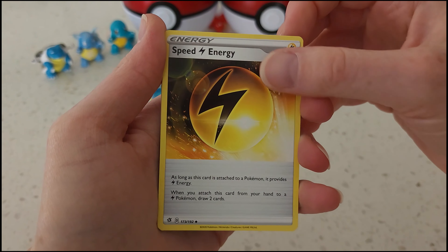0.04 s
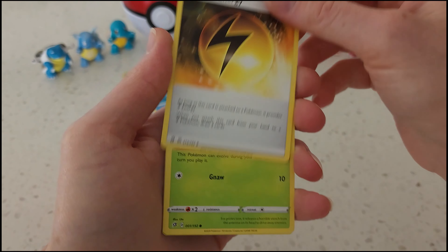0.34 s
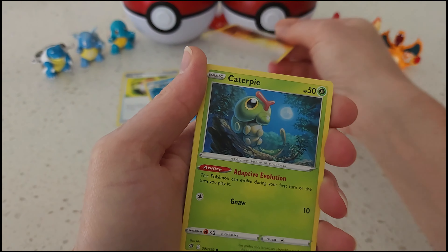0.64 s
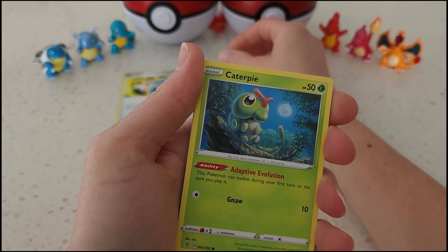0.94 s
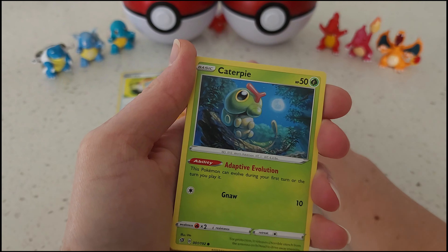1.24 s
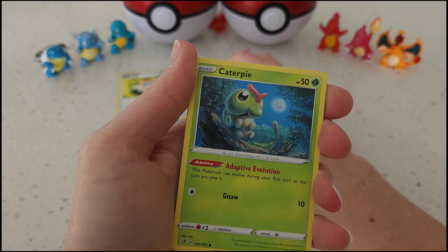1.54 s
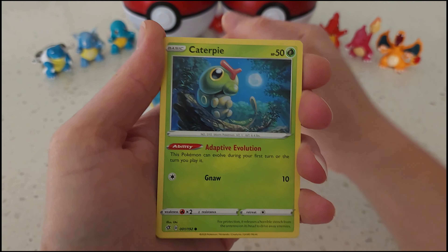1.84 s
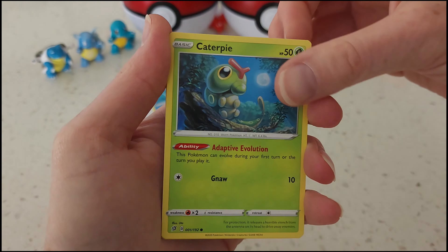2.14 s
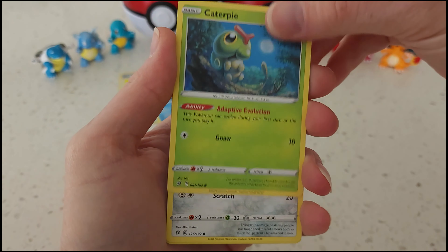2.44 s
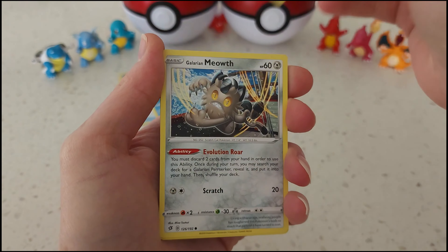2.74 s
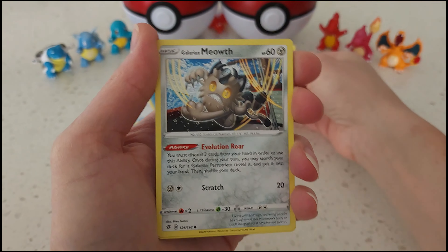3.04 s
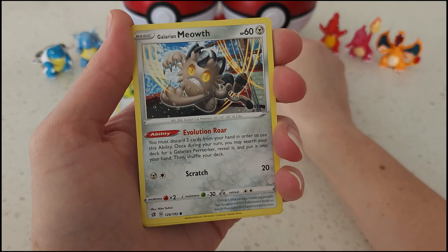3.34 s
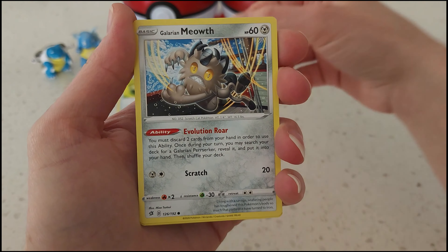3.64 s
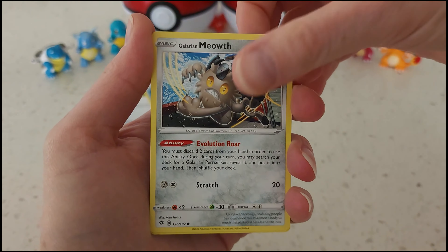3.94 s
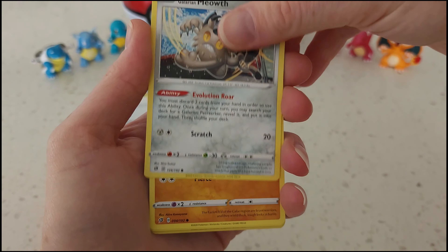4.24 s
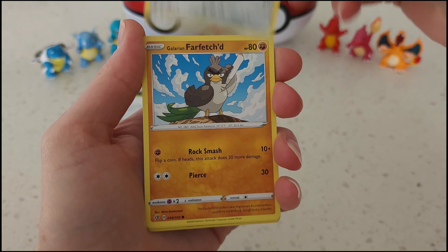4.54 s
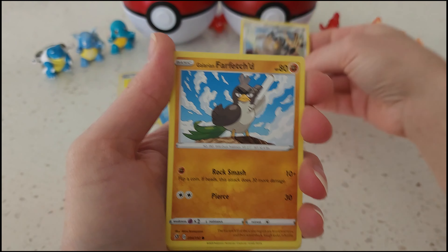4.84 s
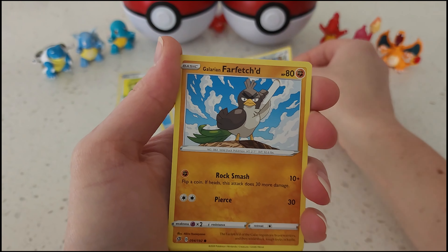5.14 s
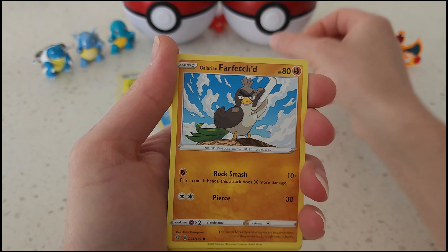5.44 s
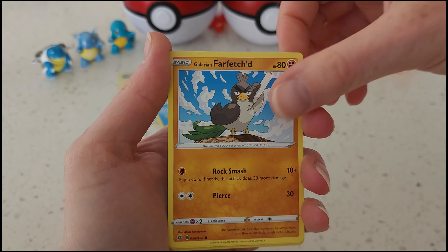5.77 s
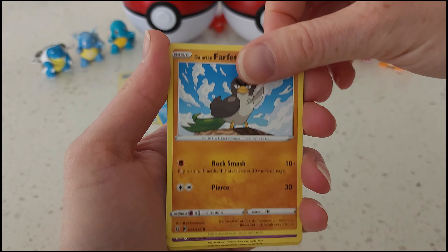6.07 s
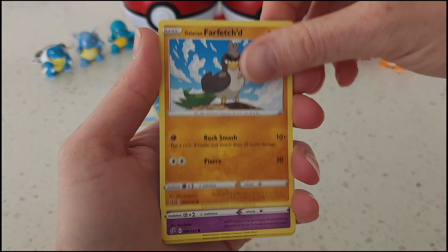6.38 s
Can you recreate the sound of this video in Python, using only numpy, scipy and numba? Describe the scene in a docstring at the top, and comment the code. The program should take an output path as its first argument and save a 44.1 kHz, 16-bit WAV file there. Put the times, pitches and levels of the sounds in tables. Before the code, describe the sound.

Stiff cards slide off a hand-held stack with soft hisses and snaps, landing on a stone table in a quiet room.

```python
"""Trading cards are pulled one at a time off a hand-held stack and laid on a stone table, close to a stereo
microphone. Card faces hiss and rasp as they slide, edges tick, and a card that slips clear of the stack
snaps and thumps against the fingers. On the table it lands with a hollow clack and glides to rest.
The small room answers briefly; far off, a household appliance drones."""
import sys
import numpy as np
from scipy import signal
from scipy.fft import rfft, irfft, next_fast_len
from scipy.io import wavfile
from scipy.ndimage import uniform_filter1d, map_coordinates
from numba import njit

SR = 44100
rng = np.random.default_rng(int(sys.argv[2]) if len(sys.argv) > 2 else 0)


def put_to_file(sound):
    """Save the sound as 16-bit audio at rate SR, in the file named by the first command-line argument."""
    columns = np.atleast_2d(sound).T  # one column per channel
    safe = np.clip(columns, -1, 1)
    whole_steps = np.round(safe * 32767)
    wavfile.write(sys.argv[1], SR, whole_steps.astype(np.int16))


N = 291501
TIME = np.arange(N) / SR

# motor and mains lines of the distant appliance: (frequency [Hz], level [dB])
APPLIANCE_LINES = [(41.09, -51), (58.67, -54.5), (117.38, -65), (234.76, -72.5), (284.6, -73),
                   (352.19, -84), (1056.85, -90), (1173.9, -92), (1701, -95), (2289.08, -95.5),
                   (2993.37, -100.6)]
# room tone and self-noise of the left microphone: (frequency [Hz], density [dB per Hz])
ROOM_TONE = [(20, -92), (45, -76), (70, -83), (125, -81), (200, -91.5), (290, -90), (400, -103),
             (500, -111), (850, -114), (1120, -108), (1420, -116), (2000, -119), (5000, -125.5),
             (15000, -133)]
MIC_SELF_NOISE = [(4000, -140), (6500, -123), (8400, -115), (9800, -136), (11500, -127), (15500, -127)]
# treble lift of the left microphone port, equal loss of the right: (frequency [Hz], gain [dB])
PORT_TILT = [(6000, 0.25), (9000, 0), (11000, 0.1), (15000, 4)]
# reverberation of the small room: (low edge [Hz], high edge [Hz], t60 [s], level [dB])
REVERB_BANDS = [(120, 810, .35, -10), (577, 900, 0.64, -14.5), (926, 2500, 0.34, -14.5),
                (2570, 7400, 0.22, -9), (5900, 23000, .36, -14.5)]

# a card slaps the table: (time [s], knock [dB], treble scrape [dB], length [s])
TABLE_SLAPS = [(.693, -59, -66, .005), (.8848, -43, -50, .003), (.9212, -51.5, -58, .003),
               (3.3485, -58, -60, .004), (3.3535, -51, -53, .0025), (3.3637, -41, -44, .0026),
               (5.1503, -61, -71, .0025), (5.2805, -52, -57, .006), (5.2865, -36.5, -43, .004),
               (5.2948, -42, -41.5, .004), (5.3004, -51, -54, .002)]
# the landed card glides to rest: (time [s], level [dB], t60 [s])
GLIDES = [(3.381, -59.5, 0.48), (5.304, -56, 0.45)]
# resonances of the card as it slaps and as it glides: (frequency [Hz], width [Hz], gain [dB])
SLAP_MODES = [(1031, 98, 8), (1330, 260, 0.5), (2060, 140, 2), (2390, 200, 3), (3120, 120, 0),
              (3460, 100, 4), (4550, 460, 4), (6560, 920, -1)]
GLIDE_MODES = [(1044, 250, -16), (3150, 300, -4), (4060, 300, -8.5), (4660, 1300, -9.5)]
# edges catch on the stack and fingers: (time [s], low [dB], mid [dB], treble [dB], length [s])
EDGE_TICKS = [(.4875, -74, -54, -47, .006), (.557, -61, -60, -56, .003), (1.3265, -86, -77, -61, .003),
              (2.7313, -68, -59, -55, .0036), (2.8285, -38, -27, -41, .0014),
              (2.8375, -35, -52, -55, .0017), (3.281, -67, -54, -61, .004), (3.373, -61, -57, -54, .002),
              (3.378, -66, -46, -44, .0022), (3.8705, -76, -58, -66, .0018), (4.098, -79, -70, -63, .0022),
              (4.138, -80, -76, -57.5, .0018), (4.5662, -54, -50, -55, .0032),
              (4.662, -48, -42.5, -51, .0022), (4.7002, -58, -48.5, -45.5, .0023),
              (6.445, -80, -77, -65, .002)]
# colours of an edge's low, mid and treble bands: (frequency [Hz], gain [dB])
EDGE_LOW = [(100, -21), (300, -3.5), (600, -13.5), (950, -3), (1300, -28.5), (3000, -33)]
EDGE_MID = [(500, -38.5), (1000, 2.5), (1400, -2.5), (1750, 2), (2300, -2.5), (2900, -3.5), (3500, -7),
            (4600, -7.5), (6500, -12), (12000, -49)]
EDGE_TREBLE = [(2000, -31), (4800, 0), (8000, 6), (10500, 0), (15500, -1.5)]
# the bent card springs free, or card and fingers bump the stack:
# (time [s], level [dB], contact cut-off [Hz], thump gain [dB])
SNAPS = [(0.559, -44.5, 1090, -7), (2.829, -18.5, 5600, -1), (2.8362, -47, 900, -17),
         (2.8443, -17.5, 900, -10), (2.853, -44, 900, 4), (3.089, -49.5, 500, 11), (3.366, -45.5, 500, 3),
         (3.8707, -50, 1900, -20), (4.568, -41.5, 600, 7.5), (4.6627, -32, 1700, 0),
         (4.678, -43.5, 890, 2.5), (5.2964, -34, 1100, -3), (5.589, -41.5, 168, 5.5), (5.66, -41.5, 140, 7),
         (5.74, -40, 149, 6.5)]
# modes of card and stack held in the hand: (frequency [Hz], gain [dB], t60 [s])
HELD_MODES = [(148.7, -8, 0.07), (261, -13, 0.061), (341.6, -12, 0.075), (460, -14.5, 0.025),
              (644, -12.5, 0.032), (787, -15.5, .035), (859, -15.5, 0.045), (1080, -10.5, 0.0047),
              (1430, -13.5, 0.033), (1630, -4, 0.014), (1860, -3.5, .012), (2600, -15, 0.021),
              (3230, -18, .008), (4020, -11, .007), (5220, -11.5, .006), (6660, -13, 0.0086)]

# friction colours of the face, the body and a light touch's thin hiss: (frequency [Hz], gain [dB])
FACE_HISS = [(1500, -28), (3000, -7), (4400, -.5), (6000, -1), (8700, -1), (10500, -1.5), (12500, -.5),
             (15000, 0)]
BODY_RASP = [(200, -17.5), (450, -9.5), (700, -9), (1100, -8.5), (1600, -0.5), (2000, -3.5), (2500, -2.5),
             (3500, -8.5), (4800, -9), (7000, -10), (14000, -35)]
LIGHT_TOUCH = [(3000, -12), (5500, -10), (7200, 1), (9000, 5), (10500, -3), (15000, -5)]
# the top card is drawn over the stack, often ending in a tug:
# (start [s], length [s], final hiss [dB], final rasp [dB], tug length [s], tug [dB])
PULLS = [(0.353, 0.17, -34.5, -51, 0.045, 16.5), (2.486, .088, -61, -60, 0.038, -3),
         (2.73, 0.1, -41.5, -44.5, 0.1, 19.5), (4.281, 0.13, -56.5, -54, 0.055, 0.5),
         (4.556, .101, -39.5, -45, 0.049, 11), (6.451, 0.11, -49.5, -51.5, 0.1, 9.5)]
# fingers shift a card in a soft swell: (middle [s], half length [s], hiss [dB], rasp [dB])
FINGER_RUBS = [(0.176, 0.019, -62.5, -87), (0.228, 0.034, -75, -69.5), (.27, 0.015, -60, -69.5),
               (0.546, 0.016, -65, -56.5), (0.696, 0.016, -63, -69), (0.79, 0.074, -67.5, -97),
               (1.03, .05, -70, -85), (1.223, 0.1, -76, -100), (1.344, 0.014, -64, -86),
               (1.428, 0.1, -70.5, -84), (1.946, 0.22, -77.5, -88), (2.336, 0.022, -65, -78),
               (2.436, 0.043, -61.5, -74.5), (2.895, 0.059, -67, -66), (2.97, 0.1, -59, -66.5),
               (3.122, 0.02, -60.5, -69.5), (3.353, .009, -60, -50), (4.253, 0.047, -57, -70),
               (4.481, 0.016, -89.5, -71), (4.687, 0.037, -64, -59.5), (4.803, 0.1, -62.5, -73),
               (4.95, 0.038, -64, -76.5), (5.048, 0.019, -66.5, -65), (6.094, 0.11, -65, -85),
               (6.206, 0.046, -69, -75), (6.32, 0.027, -61.5, -79), (6.602, 0.026, -45.5, -58)]
# the card skims onto the pile, pressing harder until flat: (time it lies flat [s], hiss [dB], rasp [dB])
PILE_SKIMS = [(0.929, -70, -69), (3.375, -53.5, -58), (5.315, -58.5, -65)]


def undb(db):
    """Decibels to gain."""
    return 10 ** (np.asarray(db) / 20)


def unit(x):
    """Scale to rms 1."""
    return x / np.sqrt(np.mean(x ** 2))


def colour(x, points):
    """Filter by (frequency [Hz], gain [dB]) points joined on a log-frequency axis."""
    hz, db = np.transpose(points)
    size = next_fast_len(N + SR // 10)
    bin_hz = np.maximum(np.fft.rfftfreq(size, 1 / SR), 1)
    gain = undb(np.interp(np.log(bin_hz), np.log(hz), db))
    return irfft(rfft(x, size) * gain, size)[..., :N]


def noise_pair(correlation):
    """Partly alike white noise for left and right."""
    mid, side = rng.standard_normal((2, N))
    return (np.sqrt(1 + correlation) * mid + np.sqrt(1 - correlation) * np.array([side, -side])) / np.sqrt(2)


def wander(rate_hz):
    """Smooth random wandering with rms 1."""
    hold = int(SR / rate_hz)
    stairs = np.repeat(rng.standard_normal(N // hold + 1), hold)
    return unit(uniform_filter1d(stairs, hold)[:N])


def pan(db):
    """Left and right gains for a left-minus-right level."""
    return undb(np.array([[db], [-db]]) / 2)


def step(at_s, width_s):
    """Smooth change from 0 to 1 around a moment."""
    return .5 + .5 * np.tanh((TIME - at_s) / width_s)


@njit
def resonance(x, hz, q):
    """State-variable band-pass whose centre can move."""
    out, band_state, low_state = np.empty(len(x)), 0., 0.
    for i in range(len(x)):
        g = np.tan(np.pi * hz[i] / SR)
        band = (band_state + g * (x[i] - low_state)) / (1 + g * (g + 1 / q))
        band_state = 2 * band - band_state
        low_state += 2 * g * band
        out[i] = band / q
    return out


def appliance(waver_s=.0005):
    """Far off, motor and mains lines drone; their timing wavers, which blurs the higher ones."""
    hum = 0
    for hz, db in APPLIANCE_LINES:
        amplitude = np.sqrt(2) * undb(db + 2 * wander(2.5))
        phase = 2 * np.pi * (hz * TIME + rng.random()) + hz * waver_s * wander(8.7)
        hum += amplitude * np.sin(phase)
    return hum


def room_tone(split_hz=600):
    """A soft rumble: long waves reach both microphone ports alike, short ones do not."""
    shared = signal.sosfilt(signal.butter(2, split_hz, fs=SR, output="sos"), noise_pair(.88))
    apart = signal.sosfilt(signal.butter(2, split_hz, "high", fs=SR, output="sos"), noise_pair(0))
    return np.sqrt(SR / 2) * colour(shared + apart, ROOM_TONE) * undb(.59 * wander(8.3))


def microphone_hiss():
    """Faint self-noise, on the left only."""
    return np.sqrt(SR / 2) * colour(rng.standard_normal(N), MIC_SELF_NOISE) * np.array([[1], [0]])


def reflections(x):
    """The small room's diffuse answer differs at each port and dies at its own rate in each band."""
    age = np.arange(int(.6 * SR)) / SR
    response = 0
    for low_hz, high_hz, t60, db in REVERB_BANDS:
        band = signal.butter(2, [low_hz, min(high_hz, .45 * SR)], "band", fs=SR, output="sos")
        tail = np.exp(-np.log(1000) * age / t60) * (1 - np.exp(-(age / .006) ** 2))
        tail /= np.sqrt(np.sum(tail ** 2))
        response += undb(db) * signal.sosfilt(band, tail * rng.standard_normal((2, len(age))))
    return signal.fftconvolve(x, response, axes=1)[:, :N]


def friction(grain_db, flutter_db):
    """Friction force: tiny slips of the card's coating on top of an uneven finger pressure."""
    return unit(undb(grain_db * wander(1800) + flutter_db * wander(90)))


def rubbed_modes(force, modes, correlation):
    """Slips ring a set of resonances, each driven by its own noise."""
    ringing = 0
    for hz, width, db in modes:
        slips = force * noise_pair(correlation)
        centre_hz = np.full(N, float(hz))
        ringing += undb(db) * np.array([resonance(side, centre_hz, hz / width) for side in slips])
    return unit(ringing)


def bursts(times, levels_db, lengths):
    """Envelope of short, sharp contacts, each with its level set over the first 4 ms."""
    envelope = np.zeros(N)
    age = np.arange(SR // 20) / SR
    for at_s, db, length in zip(times, levels_db, lengths):
        start = int(at_s * SR)
        shape = (1 - np.exp(-age / .00081)) * np.exp(-(age / (.61 * length)) ** .99)
        envelope[start:start + len(age)] += undb(db) * shape / np.sqrt(np.mean(shape[:SR // 250] ** 2))
    return envelope


def table_landings():
    """The card slaps the stone with a hollow clack and a scrape, then glides to rest."""
    times, knock_db, scrape_db, lengths = np.transpose(TABLE_SLAPS)
    force = friction(grain_db=5, flutter_db=-4.8)
    # the edge strikes first and rings the card; the face then patters down
    age = np.arange(SR // 50) / SR
    ring = sum(undb(db) * np.sin(2 * np.pi * hz * age) * np.exp(-np.pi * width * age)
               for hz, width, db in SLAP_MODES)
    blows = np.zeros(N)
    blows[(times * SR).astype(int)] = undb(knock_db)
    clack = signal.fftconvolve(blows, ring / np.std(ring[:SR // 250]))[:N]
    patter = bursts(times + lengths / 4, knock_db, lengths) * rubbed_modes(force, SLAP_MODES, .17)
    no_bass = signal.butter(3, 750, "high", fs=SR, output="sos")  # a small card radiates no long waves
    knock = signal.sosfilt(no_bass, .65 * clack + .75 * patter)
    scrape = bursts(times, scrape_db, lengths) * unit(colour(force * noise_pair(.048), EDGE_TREBLE))
    speed = sum((TIME > start) * undb(db - 60 * np.abs(TIME - start) / t60) for start, db, t60 in GLIDES)
    glide = speed * rubbed_modes(force, GLIDE_MODES, .074)
    return (knock + scrape + glide) * pan(-.54)


def edge_ticks():
    """An edge scrapes for a few milliseconds: a sharp burst of slips."""
    times, low_db, mid_db, treble_db, lengths = np.transpose(EDGE_TICKS)
    force = friction(grain_db=1, flutter_db=2)
    bands = [(low_db, EDGE_LOW, .8), (mid_db, EDGE_MID, .45), (treble_db, EDGE_TREBLE, .15)]
    return sum(bursts(times, db, lengths) * unit(colour(force * noise_pair(correlation), points))
               for db, points, correlation in bands)


def card_snaps(thump_below_hz=500):
    """Each blow rings the held card's modes; soft contacts are dull, and the hand adds a low thump."""
    snaps = np.zeros(N)
    age = np.arange(SR // 5) / SR
    hz, db, t60 = np.transpose(HELD_MODES)[:, :, None]
    polarity = (-1) ** np.arange(len(hz))[:, None]  # neighbouring modes bend opposite ways
    rings = polarity * undb(db) * np.sin(2 * np.pi * hz * age) * np.exp(-np.log(1000) * age / t60)
    for at_s, blow_db, contact_hz, thump_db in SNAPS:
        weight = undb(blow_db + thump_db * (hz < thump_below_hz)) / np.sqrt(1 + (hz / contact_hz) ** 4)
        start = int(at_s * SR)
        snaps[start:start + len(age)] += (weight * rings).sum(axis=0)
    return np.array([snaps, np.roll(snaps, shift=2)])  # the left port hears it slightly earlier


def flex(x, depth_db, patch_hz, patch_s):
    """The bending card favours ever different pitches: narrow peaks and dips come and go."""
    hz, times, frames = signal.stft(x, SR, nperseg=512)
    field = rng.standard_normal((256, 1024))
    where = np.meshgrid(hz / patch_hz, times / patch_s, indexing="ij")
    gain = undb(depth_db * map_coordinates(field, where, order=3, mode="wrap"))
    return unit(signal.istft(frames * gain, SR)[1][:, :N])


def hand_strokes():
    """Pulls, rubs and skims add in power to drive hiss and rasp; pulls also move the card's resonance."""
    loose_hz, pinned_hz, free_hz = 2270., 3600, 1750  # in the fingers, on the stack, fully drawn
    hiss_swell_db, rasp_swell_db = 8, 22.5  # a pull gathers speed
    tug_ease, tug_rasp_share = 2.36, .34  # the tug bites at once and levels off
    skim_rise_db_per_s, skim_fall_db_per_s = 113, 270
    moves, ring_hz = [], np.full(N, loose_hz)
    for start, length, hiss_db, rasp_db, tug_s, tug_db in PULLS:
        drawn = np.clip((TIME - start) / length, 0, 1)
        touching = step(start, width_s=.004) * (1 - step(start + length, width_s=.007))
        held_back_db = tug_db * np.clip((start + length - TIME) / tug_s, 0, 1) ** tug_ease
        hiss_curve_db = hiss_db - hiss_swell_db * (1 - drawn) - held_back_db
        rasp_curve_db = rasp_db - rasp_swell_db * (1 - drawn) - tug_rasp_share * held_back_db
        moves.append(touching * undb([hiss_curve_db, rasp_curve_db]))
        ring_hz += touching * (pinned_hz * (free_hz / pinned_hz) ** drawn - loose_hz)
    for middle, half_length, hiss_db, rasp_db in FINGER_RUBS:
        offset = np.minimum(np.abs((TIME - middle) / half_length), 10)
        swell = np.exp(-offset ** 1.7)  # a power of 2 is round, 1 pointed
        moves.append(swell * undb([[hiss_db], [rasp_db]]))
    for flat_s, hiss_db, rasp_db in PILE_SKIMS:
        age = TIME - flat_s
        pressure = undb(-np.maximum(-skim_rise_db_per_s * age, skim_fall_db_per_s * age))
        moves.append(pressure * undb([[hiss_db], [rasp_db]]))
    hiss_gain, rasp_gain = np.sqrt(sum(move ** 2 for move in moves))
    return hiss_gain, rasp_gain, ring_hz


def card_slides(full_rasp_db=-60.5):
    """Slips radiate directly as hiss and shake the card, whose resonance moves with its free length."""
    hiss_gain, rasp_gain, ring_hz = hand_strokes()
    force = friction(grain_db=0, flutter_db=1.5)
    hiss = flex(colour(force * noise_pair(-.05), FACE_HISS), depth_db=2.8, patch_hz=330, patch_s=.04)
    fullness = np.minimum(rasp_gain / undb(full_rasp_db), 1) ** .82  # a light touch thins the hiss
    hiss = fullness * hiss + (1 - fullness) * colour(hiss, LIGHT_TOUCH)
    body = unit(colour(force * noise_pair(.2), BODY_RASP))
    ring = unit(np.array([resonance(side, ring_hz, q=1.5) for side in body]))
    rasp = flex(body + .45 * ring, depth_db=3, patch_hz=260, patch_s=.035)
    return hiss * hiss_gain * pan(.77) + rasp * rasp_gain * pan(.52)


def scene():
    """Cards close up and near the centre, with their reflections and the quiet room behind."""
    cards = card_slides() + edge_ticks() + card_snaps() + table_landings()
    return cards + reflections(cards) + (appliance() + room_tone()) * pan(.38) + microphone_hiss()


def record(dry):
    """The microphone's two ports differ in the treble; the recorder cuts the top."""
    left = colour(dry[0], PORT_TILT)
    right = colour(dry[1], [(hz, -db) for hz, db in PORT_TILT])
    top_cut = signal.ellip(10, .2, 70, 15750, fs=SR, output="sos")
    return signal.sosfilt(top_cut, [left, right])


dry = scene()
out = record(dry)
put_to_file(out)
```